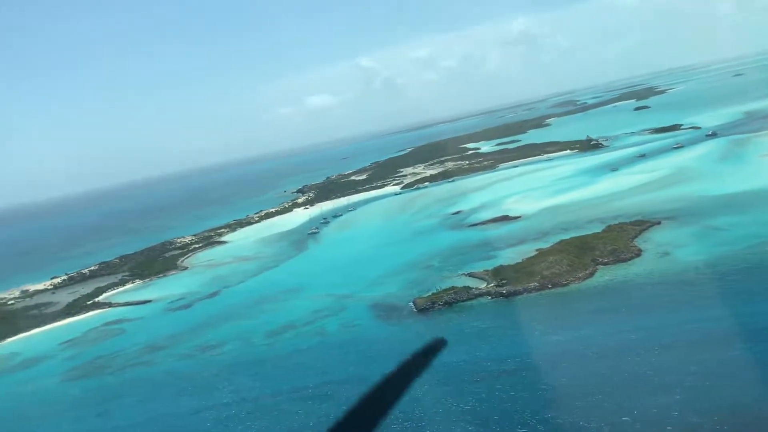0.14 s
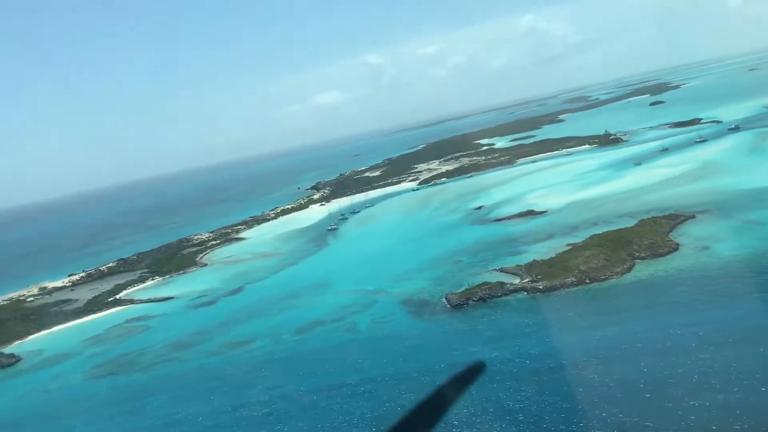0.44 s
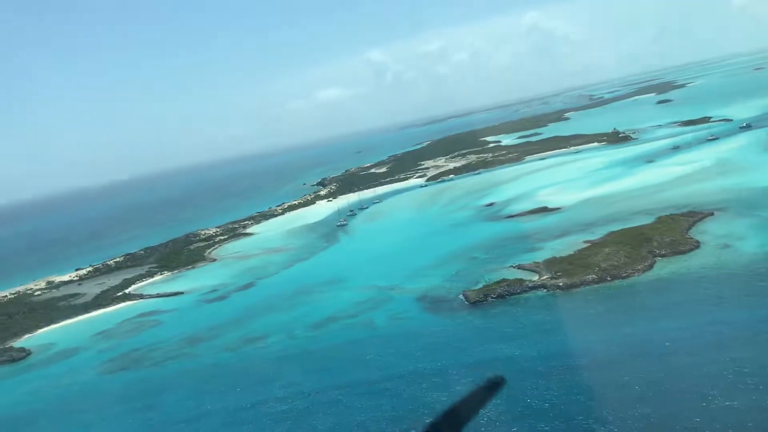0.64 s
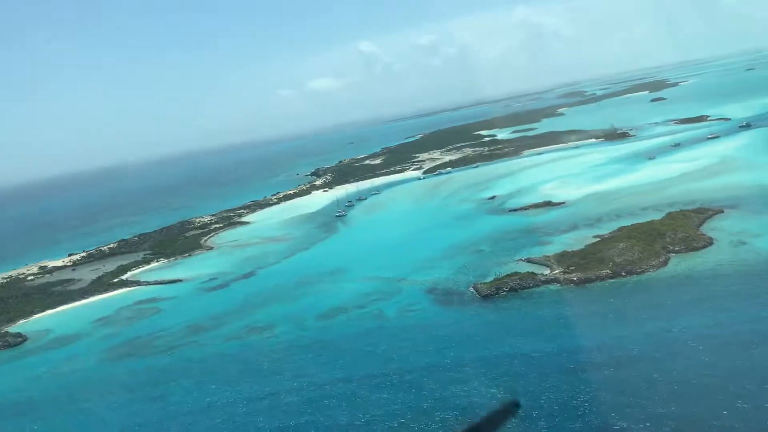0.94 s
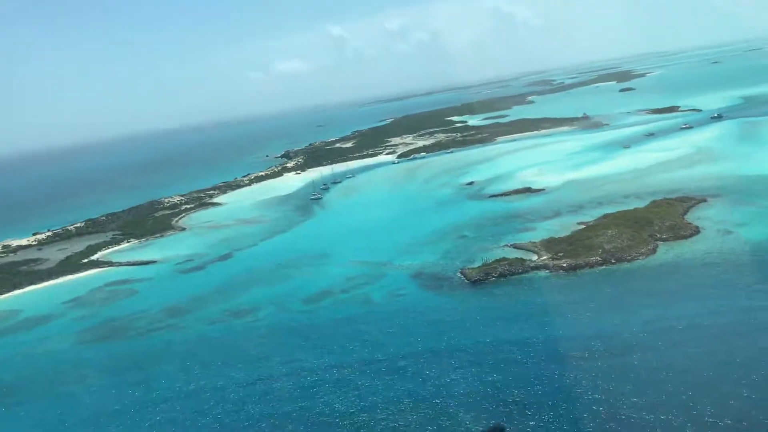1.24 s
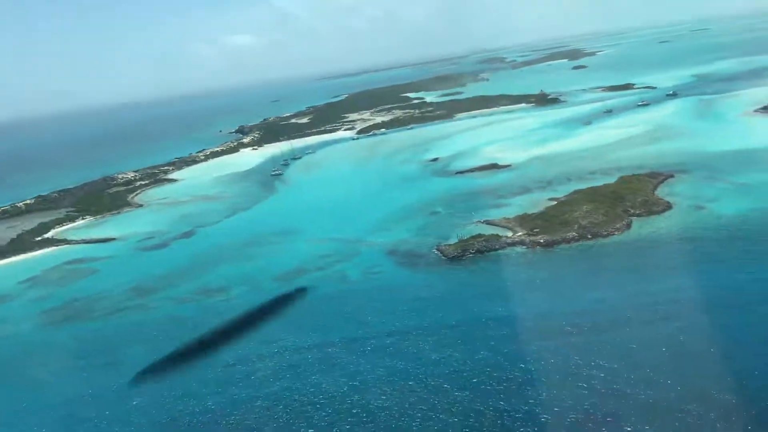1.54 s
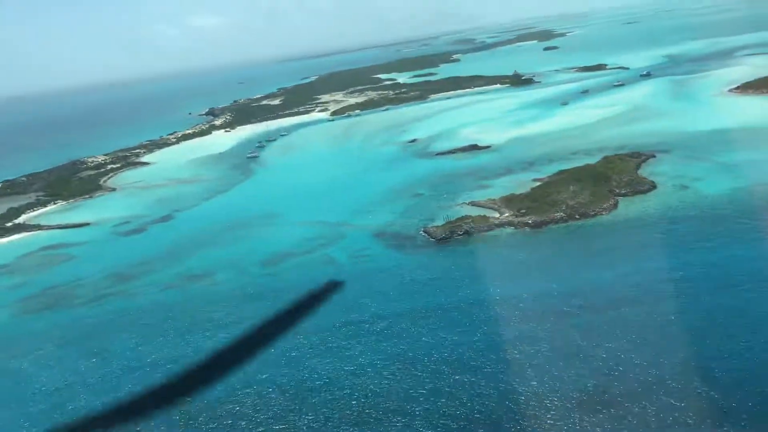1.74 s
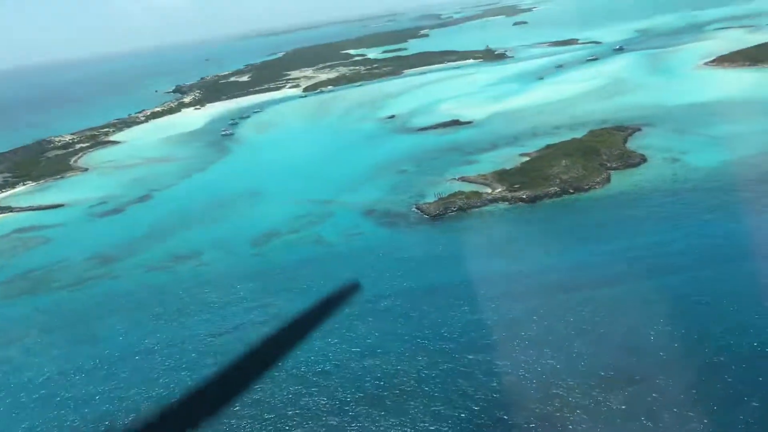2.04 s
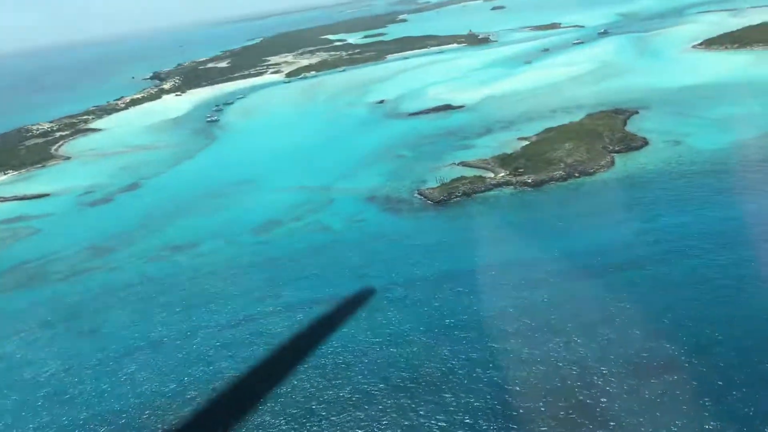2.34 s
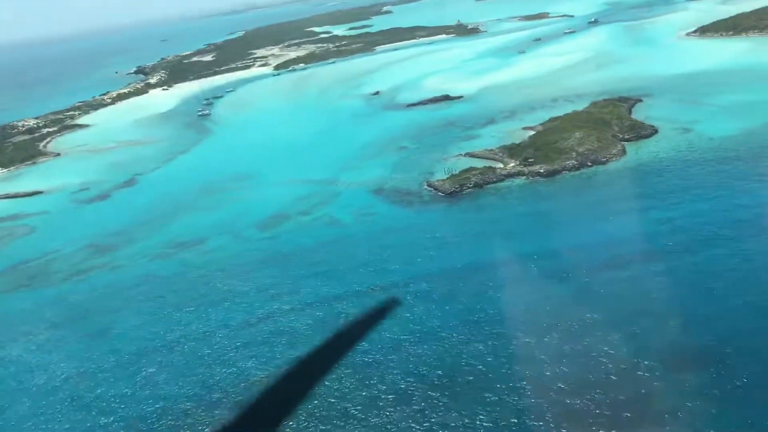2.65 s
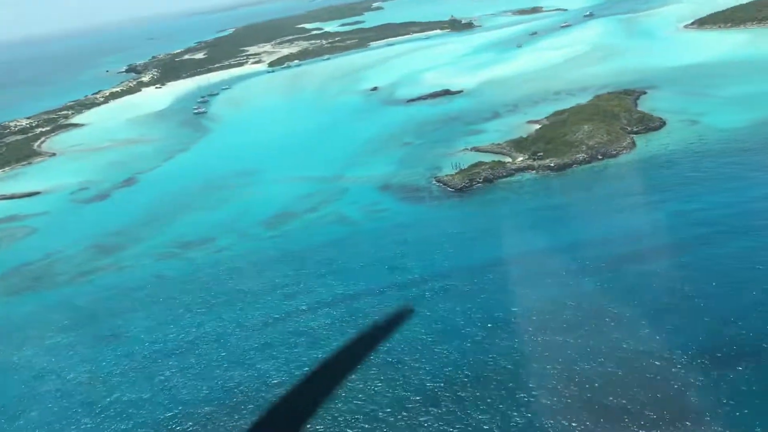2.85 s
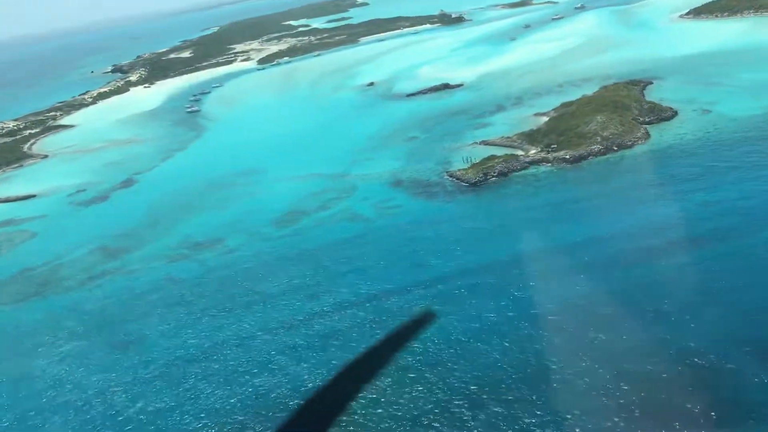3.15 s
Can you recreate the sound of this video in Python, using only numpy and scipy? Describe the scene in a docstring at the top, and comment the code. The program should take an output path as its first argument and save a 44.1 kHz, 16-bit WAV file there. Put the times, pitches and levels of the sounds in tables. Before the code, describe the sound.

Steady deep drone of propeller plane engines heard from inside the cabin, with rumble and soft wind hiss

```python
"""Two piston engines drone in the cabin of a small airplane in cruise; the main hum dips, then fills the cabin.
Their firing and propeller tones are multiples of one engine cycle. Drawn level curves make them swell and
fade, as when engines drift in and out of step. Under them, low shaped noise makes the cabin rumble.
The slipstream is noise that roars and hisses along the windows, with a breathy tone from a window gap."""
import sys
import numpy as np
from scipy import signal
from scipy.fft import rfft, irfft
from scipy.io import wavfile
from scipy.ndimage import uniform_filter1d

SR = 44100
rng = np.random.default_rng(int(sys.argv[2]) if len(sys.argv) > 2 else 0)


def inscribe(sig):
    """Save sig as 16-bit PCM at rate SR to the path in sys.argv[1].

    A 1-D sig is mono; a 2-D sig holds one channel per row.
    Samples are clipped to [-1, 1] before scaling.
    """
    pcm = np.round(np.clip(np.atleast_2d(sig).T, -1, 1) * 32767)
    wavfile.write(sys.argv[1], SR, pcm.astype(np.int16))


N = 145530  # length in samples, 3.3 s
T = np.arange(N) / SR  # time of each sample, s
HZ = np.fft.rfftfreq(N, 1 / SR)  # frequency of each spectrum bin


def amp(db):
    """Turns decibels into gain."""
    return 10 ** (np.asarray(db) / 20)


def unit(x):
    """Scales a signal to an rms (average strength) of 1."""
    return x / np.sqrt(np.mean(abs(x) ** 2) + 1e-20)


def curve(points):
    """Joins (seconds, value) points by straight lines."""
    return np.interp(T, *np.transpose(points))


def noise(points):
    """Makes noise of rms 1 whose spectrum follows (Hz, dB) points."""
    hz, db = np.transpose(points)
    spectrum_db = np.interp(np.log(HZ + 1), np.log(hz + 1), db)  # straight lines over log frequency
    return unit(irfft(rfft(rng.standard_normal(N)) * amp(spectrum_db), N))


def drift(rate_hz):
    """Makes a random wander of rms 1 that weakens steadily above the given rate."""
    lowpass = (HZ > 0) / (1 + (HZ / rate_hz) ** 2) ** 2
    return unit(irfft(rfft(rng.standard_normal(N)) * lowpass, N))


def complex_drift(rate_hz):
    """Pairs two wanders, so that both level and phase change."""
    return drift(rate_hz) + 1j * drift(rate_hz)


# Engine speed. Each row: time in seconds, firings per second of one cylinder bank in Hz.
BANK_SPEED = [(0, 59.7), (.5, 59.77), (1.3, 59.7), (2.1, 59.82), (2.7, 59.7), (3.3, 59.76)]


def engine_angle():
    """Adds up the engine speed into the phase of the bank firing rate, in radians."""
    return 2 * np.pi * np.cumsum(curve(BANK_SPEED)) / SR


# Levels of the tones at 1 to 6 times the bank rate: throb, main hum, third, octave above the hum,
# fifth and sixth. Each row: time in seconds, rms level in dB before the flutter.
THROB_LEVEL = [(0, -38), (.15, -24), (.31, -28), (.48, -19), (.57, -37), (.66, -30), (.82, -26),
               (1.28, -26), (1.55, -40), (2.05, -37), (2.35, -35), (2.52, -27), (2.65, -33), (3.1, -24),
               (3.3, -27)]
HUM_LEVEL = [(0, -25), (.08, -29.5), (.2, -34), (.3, -20), (.45, -15), (.56, -14.5), (.7, -12.5),
             (1.15, -13), (1.4, -13), (2.14, -14), (2.28, -17), (2.45, -15.3), (2.75, -15), (3.1, -15),
             (3.3, -17)]
THIRD_LEVEL = [(0, -22), (.22, -20), (.31, -34), (.44, -23.5), (.62, -39), (.82, -26), (.99, -37.5),
               (1.2, -27), (1.6, -23.5), (1.9, -29), (2.07, -26.5), (2.62, -35), (2.78, -21.5),
               (2.92, -30.5), (3.05, -29), (3.3, -30)]
OCTAVE_LEVEL = [(0, -28.5), (.16, -32), (.42, -26), (.65, -23), (1.15, -23), (1.6, -33), (1.8, -32.5),
                (2.15, -27.5), (2.65, -26.5), (3.3, -26.5)]
FIFTH_LEVEL = [(0, -34), (.22, -42), (.5, -30), (.8, -39.5), (1.1, -32.5), (1.33, -55), (1.7, -39.5),
               (2, -39), (2.4, -45), (2.56, -35), (2.8, -50), (3.02, -37), (3.3, -63)]
SIXTH_LEVEL = [(0, -33), (.25, -35), (.45, -41), (.62, -37), (.95, -40), (1.33, -36.5), (1.55, -44.5),
               (1.9, -40), (2.25, -39.5), (2.47, -43), (2.8, -41), (3, -39), (3.3, -39)]
# Lesser tones. Each row: multiple of the four-stroke cycle rate, rms level in dB before the shake.
LESSER_TONES = [(2, -44.5), (4, -36), (5, -29.5), (7, -34), (8, -49), (10, -41), (14, -48), (16, -56),
                (17, -51.5), (20, -50), (21, -50.5), (22, -53), (24, -49.5), (26, -55), (30, -56.5),
                (33, -53.5), (42, -57), (46, -58), (48, -59), (54, -56.5)]
# Cabin vibration, shared with the rumble. Each row: time in seconds, level change in dB.
CABIN_SHAKE = [(0, 0), (.25, 3.5), (.5, 1.5), (.8, 0.5), (1.15, -1), (1.4, -0.5), (1.7, -2.5), (2.1, -2),
               (2.5, -1), (2.9, -0.5), (3.3, 2)]
BANK_CYLINDERS = 3  # bank firings in one four-stroke cycle
TONES_FOLLOW = 0.8  # share of the shake (in dB) that the lesser tones follow
FLUTTER, FLUTTER_HZ = .025, 13  # depth and rate: bank tones are nearly clean
WAVER, WAVER_HZ = 0.27, 3.9  # depth and rate: lesser tones wander in level and phase


def engines(angle):
    """Repeated firing gives multiples of the engine cycle: six swelling bank tones, many lesser ones."""
    tones = np.zeros(N)
    shake_db = TONES_FOLLOW * curve(CABIN_SHAKE)
    bank_levels = [THROB_LEVEL, HUM_LEVEL, THIRD_LEVEL, OCTAVE_LEVEL, FIFTH_LEVEL, SIXTH_LEVEL]
    for multiple, level in enumerate(bank_levels, start=1):
        gain = amp(curve(level)) * (1 + FLUTTER * drift(FLUTTER_HZ))
        tones += gain * np.cos(multiple * angle + 2 * np.pi * rng.random())
    for order, db in LESSER_TONES:
        waver = unit(1 + WAVER * complex_drift(WAVER_HZ))
        phase = round(order) * angle / BANK_CYLINDERS + 2 * np.pi * rng.random()
        tones += amp(db + shake_db) * (waver * np.exp(1j * phase)).real
    return np.sqrt(2) * tones  # turns peak levels into rms levels


# Cabin rumble. Each row: frequency in Hz, relative noise strength in dB per Hz.
RUMBLE_SPECTRUM = [(15, -30), (30, -23), (42, -10), (55, 5.5), (75, -0.5), (100, 1), (140, -1.5), (185, -3),
                   (220, -7), (280, -5), (330, -11), (385, -16.5), (440, -22.5), (600, -29), (1200, -57)]
RUMBLE_DB = -25.5  # rms level before the shake


def cabin_rumble():
    """Uneven combustion and buffeting shake the cabin panels: low noise that follows the shake."""
    return amp(RUMBLE_DB + curve(CABIN_SHAKE)) * noise(RUMBLE_SPECTRUM)


# Width in Hz and length in seconds of the peaks in the air noise, and their rms depth in dB.
GRAIN_HZ, GRAIN_S, PATCHY_DB = 70, .5, 1.5


def patchy(x, size=2048):
    """Gives a noise narrow peaks and dips that shift slowly."""
    hz, t, z = signal.stft(x, SR, nperseg=size)
    field = rng.standard_normal(z.shape)
    field = uniform_filter1d(field, max(1, round(GRAIN_HZ / hz[1])), 0)  # smooth over frequency
    field = unit(uniform_filter1d(field, max(1, round(GRAIN_S / t[1])), 1))  # smooth over time
    return unit(signal.istft(z * amp(PATCHY_DB * field), SR, nperseg=size)[1][:N])


# Spectra of the roar and the window hiss. Each row: frequency in Hz, relative strength in dB per Hz.
ROAR_SPECTRUM = [(100, -24), (350, -8), (480, 0), (620, -1.5), (740, -1.5), (880, 0.5), (1020, -4.5),
                 (1250, -2.5), (1550, -5), (1900, -10), (2120, -9), (2500, -18), (3300, -19), (6000, -60)]
HISS_SPECTRUM = [(1000, -16), (2300, 1), (2600, -2), (2730, 1.5), (3150, 0.5), (3550, 0), (4100, 0),
                 (4600, -2), (4950, -3.5), (5150, -2.5), (5450, -0.5), (5650, 1), (6900, 1), (7600, -4.5),
                 (8200, -4.5), (8700, -7.5), (9400, -6), (10400, -10.5), (10950, -5.5), (11400, -9),
                 (13500, -14), (15700, -14)]
# Their levels before flicker and chop. Each row: time in seconds, rms level in dB.
ROAR_LEVEL = [(0, -39.5), (.3, -37.5), (.6, -37.2), (1, -39.5), (1.35, -39.5), (1.8, -41.5), (2.3, -41.5),
              (2.7, -40), (3, -38.5), (3.3, -38.5)]
HISS_LEVEL = [(0, -41.5), (.3, -41), (.6, -41), (1, -42), (1.35, -44.5), (1.8, -44.6), (2.3, -44.5),
              (2.75, -43), (3, -43), (3.3, -42)]
ROAR_FLICKER_DB, HISS_FLICKER_DB, FLICKER_HZ = 0.49, .25, 30  # rms depths and shared rate
CHOP = .1  # depth to which the propeller blades chop the roar


def slipstream(angle):
    """Air roars over the skin, lightly chopped by the blades, and hisses at the windows."""
    roar_gain = amp(curve(ROAR_LEVEL) + ROAR_FLICKER_DB * drift(FLICKER_HZ))
    chop = 1 + CHOP * np.cos(2 * angle)  # twice the bank rate, like the main hum
    roar = roar_gain * patchy(noise(ROAR_SPECTRUM)) * chop
    hiss_gain = amp(curve(HISS_LEVEL) + HISS_FLICKER_DB * drift(FLICKER_HZ))
    hiss = hiss_gain * patchy(noise(HISS_SPECTRUM))
    return roar + hiss


# Airy resonance of a window gap. Each row: time in seconds, centre frequency in Hz, level in dB.
GAP_RESONANCE = [(0, 4130, -54), (.5, 4350, -52), (.9, 4353, -52), (1.5, 4314, -57.5), (2.2, 4375, -55),
                 (2.7, 4146, -56), (3, 4000, -52), (3.3, 4040, -50)]
GAP_WIDTH_HZ = 510  # how fast the breath wanders, which spreads it around the centre


def window_gap():
    """A breathy resonance: random wander moved up to a slowly sliding centre pitch."""
    s, hz, db = np.transpose(GAP_RESONANCE)
    centre = np.exp(2j * np.pi * np.cumsum(np.interp(T, s, hz)) / SR)
    breath = unit((centre * complex_drift(GAP_WIDTH_HZ)).real)
    return amp(np.interp(T, s, db)) * breath


def scene():
    """Adds engines, cabin and airflow into one channel."""
    angle = engine_angle()
    return (engines(angle) + cabin_rumble() + slipstream(angle) + window_gap())[None]


EDGE_HZ = 15760  # upper edge of the sound


def record(dry):
    """Cuts the treble steeply above the edge."""
    lowpass = signal.firwin(1023, EDGE_HZ, window=("kaiser", 9), fs=SR)
    return signal.oaconvolve(dry, lowpass[None], "same")


dry = scene()
out = record(dry)
inscribe(out)
```